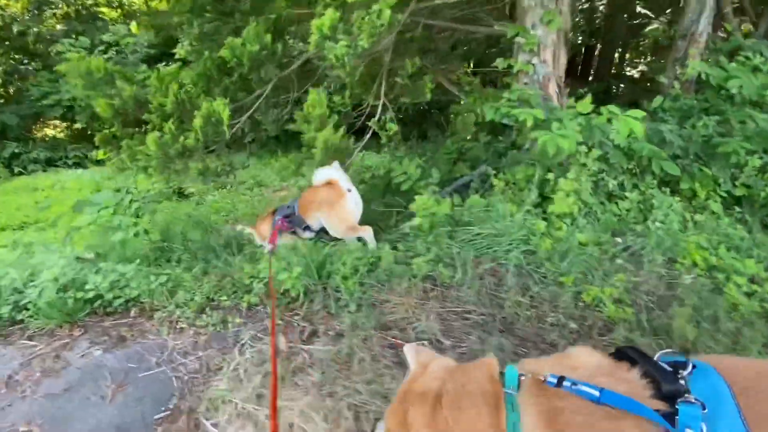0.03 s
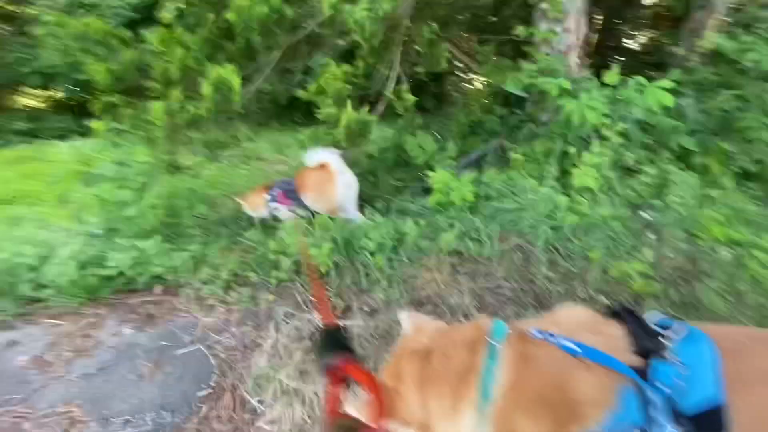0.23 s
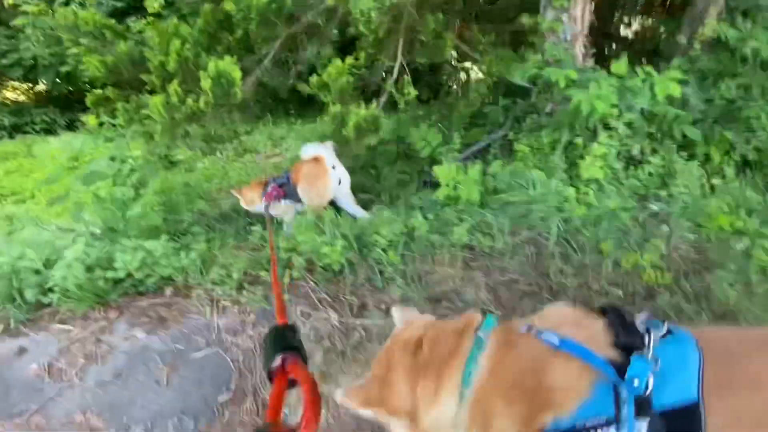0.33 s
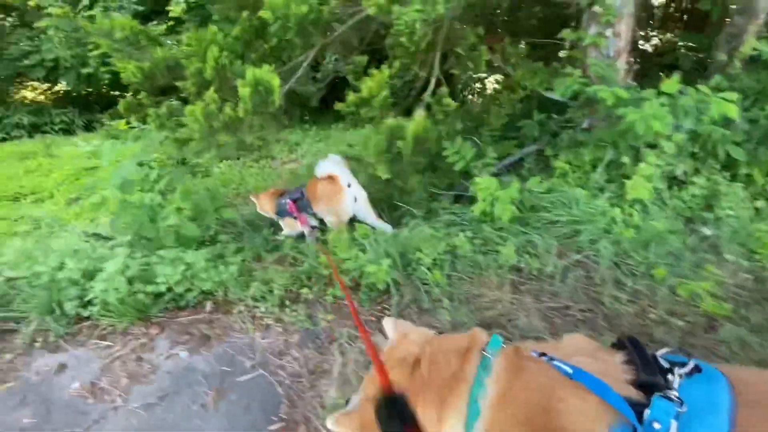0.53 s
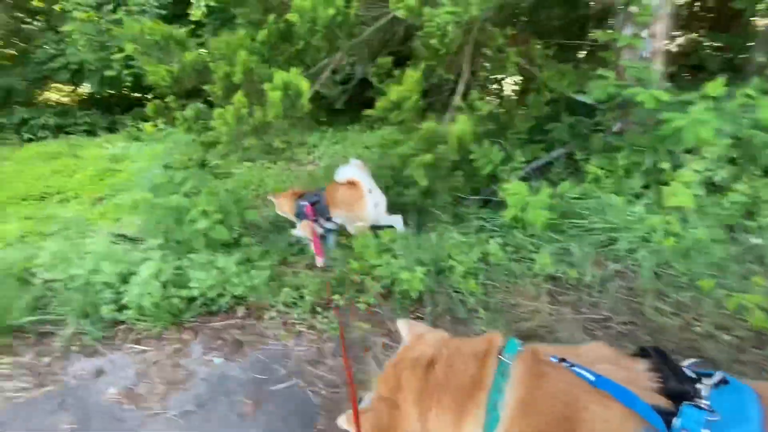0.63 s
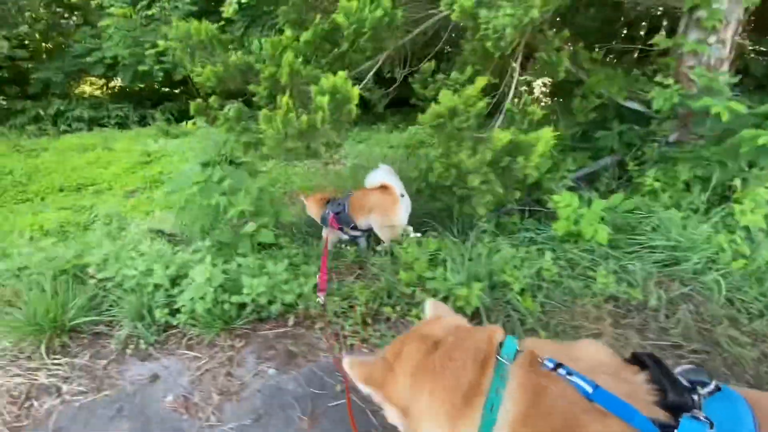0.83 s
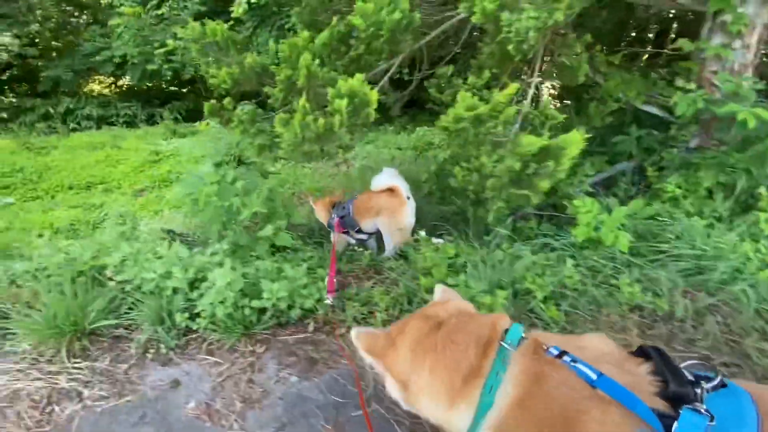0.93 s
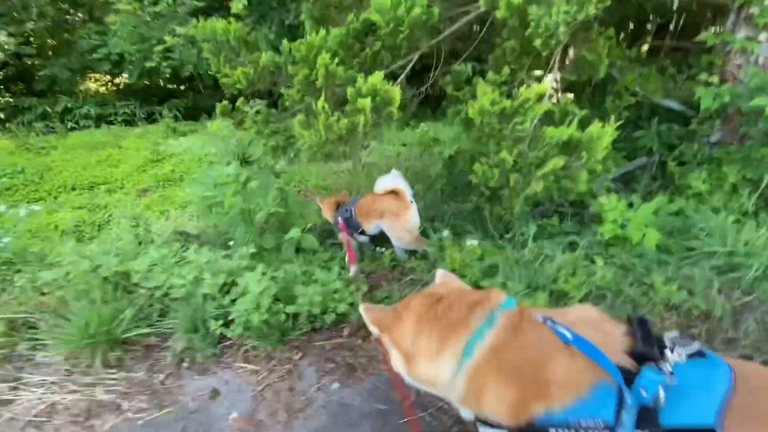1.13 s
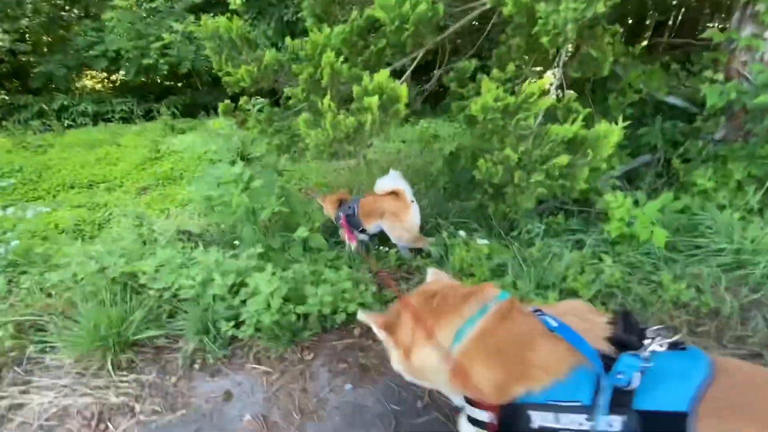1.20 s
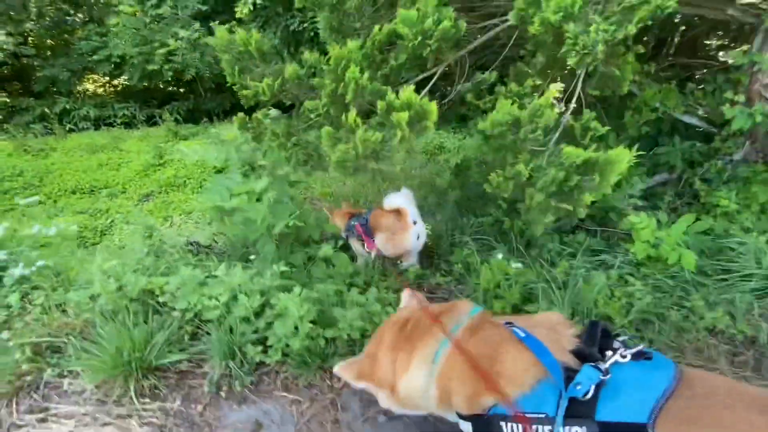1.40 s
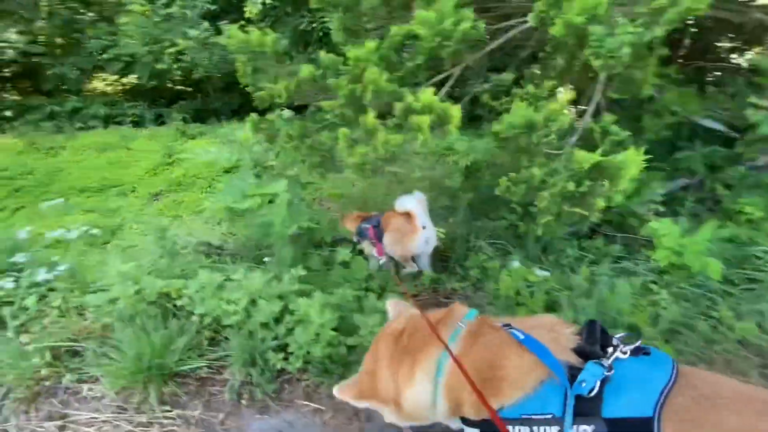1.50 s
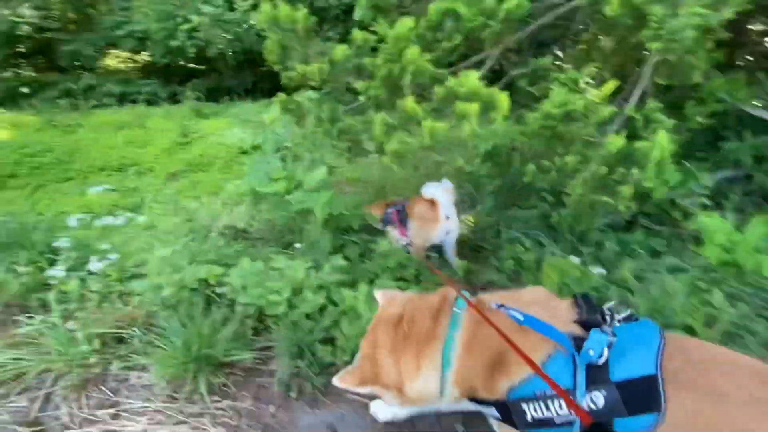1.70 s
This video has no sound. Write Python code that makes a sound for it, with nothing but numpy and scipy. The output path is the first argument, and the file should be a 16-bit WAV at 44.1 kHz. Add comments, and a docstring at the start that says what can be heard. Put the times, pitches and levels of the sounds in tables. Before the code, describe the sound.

A plastic leash handle knocks close by at about 0.2 seconds, a quick hollow clatter with sharp, ringing clicks of metal clips. Lighter buckle clicks follow near 0.4, 1.1 and 1.5 seconds. Feet and dog paws softly pat and scuff on dirt around 0.6, 1.0 and 1.5 seconds. Throughout, an insect ticks faintly on the left over distant insects, hissing leaves and light wind.

```python
"""A plastic leash handle knocks up close and clips and harness buckles click, as two dogs are walked
along a wooded verge. Each knock is a low thud that rings the hollow shell; each click is a crack with
a rattle and a ring of metal. Feet and paws pat and scuff on the dirt. An insect ticks in the bushes
on the left, over a steady bed of far insects, hissing leaves and light wind."""
import sys
import numpy as np
from scipy import signal
from scipy.fft import rfft, irfft
from scipy.io import wavfile

SR = 44100
rng = np.random.default_rng(int(sys.argv[2]) if len(sys.argv) > 2 else 0)


def wrap_up_sound(samples):
    """Save the sound to the file named by the first command line argument, as 16-bit audio."""
    columns = np.atleast_2d(samples).T
    # keep every value between -1 and 1, then stretch to whole-number steps
    tamed = np.clip(columns, -1, 1)
    steps = np.round(tamed * 32767).astype(np.int16)
    wavfile.write(sys.argv[1], SR, steps)


N = 77175
T = np.arange(N) / SR
HZ = np.maximum(np.fft.rfftfreq(N, 1 / SR), 1)
GROUND_LEAD_MS, INSECT_LEAD_MS = 0.088, 0.191  # both lie to the left, so that ear hears them first


def undb(db):
    """Decibels to gain."""
    return 10 ** (np.asarray(db) / 20)


def unit(x):
    """Scale to rms 1."""
    return x / np.sqrt(np.mean(x ** 2))


def hit(x):
    """Scale a short sound to the energy of rms 1 held for 3 ms."""
    return unit(x) * np.sqrt(0.003 * SR / N)


def shape(x, gain):
    """Filter by a gain for each frequency."""
    return irfft(rfft(x) * gain, N)


def colour(points):
    """EQ curve through (frequency [Hz], level [dB]) points."""
    hz, db = np.array(points, float).T
    return undb(np.interp(np.log(HZ), np.log(hz), db))


def band(low_hz, high_hz, order=6):
    """Band-pass gain; a higher order gives steeper edges."""
    return 1 / np.sqrt((1 + (low_hz / HZ) ** order) * (1 + (HZ / high_hz) ** order))


def resonance(hz, q):
    """Response of one damped resonance."""
    return 1 / (1 + 1j * q * (HZ / hz - hz / HZ))


def noise(gain, alike=0):
    """Coloured stereo noise of rms 1; alike is the share common to both ears."""
    white = rng.standard_normal((3, N))
    return unit(shape(np.sqrt(1 - alike) * white[:2] + np.sqrt(alike) * white[2], gain))


def waver(rate_hz):
    """Random flutter of rms 1, mostly slower than rate_hz."""
    return unit(shape(rng.standard_normal(N), np.exp(-(HZ / rate_hz) ** 2) * (HZ > 1)))


def fade(start, rise_s, decay_s):
    """Linear attack, then exponential decay."""
    age = np.maximum(T - start, 0)
    return np.minimum(age / rise_s, 1) * np.exp(-np.maximum(age - rise_s, 0) / decay_s)


def place(x, lead_ms, pan_db=0):
    """Delay the right ear and pan; positive is left."""
    left = np.full_like(HZ, undb(pan_db / 2))
    right = undb(-pan_db / 2) * np.exp(-2j * np.pi * HZ * lead_ms / 1000)
    return shape(x, np.array([left, right]))


def thud(start, low_hz, high_hz, lag_cycles, spread_rad, order=6):
    """A soft band-limited blow whose lows arrive later, so its pitch falls; steep edges sound hollow."""
    phase = -2 * np.pi * (HZ * start + lag_cycles * np.log(HZ))
    ear_phase = np.array([[0.5], [-0.5]]) * spread_rad
    return hit(irfft(band(low_hz, high_hz, order) * np.exp(1j * (phase + ear_phase)), N))


def chime(start, modes):
    """Struck modes that die away."""
    return sum(undb(db) * np.sin(2 * np.pi * hz * (T - start)) * fade(start, 0.00066, t60 / np.log(1000))
               for hz, db, t60 in modes)


def leaves():
    """An even, wide hiss of leaves over a low, uneven rustle."""
    # EQ of the hiss and of the rustle (frequency [Hz], level [dB])
    hiss_eq = [(200, -43), (1500, -15), (2600, 4.5), (3500, 1.5), (4600, 4.5), (7500, 4.5), (10500, 0),
               (12500, -18.5), (14000, 4.5), (15400, 0), (16100, -21)]
    rustle_eq = [(30, 3.5), (100, 3.5), (300, 0), (700, 0.5), (1200, 0), (2200, -3), (3500, -19.5),
                 (8000, -44)]
    # swells of the rustle (time [s], level [dB])
    swells = [(0, -52), (.2, -53), (.45, -53), (.66, -56), (.8, -54.5), (.9, -60), (1.05, -55),
              (1.3, -53.5), (1.5, -57), (1.62, -61), (1.75, -55.5)]
    hiss = noise(colour(hiss_eq), alike=0.011) * undb(-53.5 + 0.5 * waver(31))
    swell_db = np.interp(T, *np.array(swells).T)
    rustle = noise(colour(rustle_eq), alike=0.7) * undb(swell_db + 1.8 * waver(45))
    return hiss + place(rustle, GROUND_LEAD_MS)


def wind():
    """Light gusts rumble on the microphone."""
    # EQ of the rumble (frequency [Hz], level [dB])
    rumble_eq = [(20, -40), (33, -27), (53, 20), (80, -3), (130, 1), (300, -22), (1000, -76)]
    # rise and fall of the gusts (time [s], level [dB])
    gusts = [(0, -77), (.2, -62), (.3, -45), (.4, -66), (.75, -54), (.92, -68.5), (1.02, -51), (1.35, -69),
             (1.54, -58), (1.59, -95), (1.75, -73)]
    gust_db = np.interp(T, *np.array(gusts).T)
    return noise(colour(rumble_eq), alike=0.41) * undb(gust_db + 0.64 * waver(9.1))


def far_insects():
    """A distant chorus blurs into a high shimmer."""
    # EQ of the chorus (frequency [Hz], level [dB])
    chorus_eq = [(3500, -23), (4800, -11), (5400, -1.5), (5850, 2), (6300, -0.5), (7200, -12.5), (8400, -2),
                 (9300, -15), (12000, -43)]
    chorus = noise(colour(chorus_eq), alike=0.28) * undb(-52.5 + 1.2 * waver(38))
    return place(chorus, INSECT_LEAD_MS, pan_db=2.0)


def near_insect():
    """One insect ticks on the left, each tick a short tone echoed by the bushes."""
    # insect ticks (time [s], level [dB])
    ticks = [(0.017, -51.5), (.355, -50), (0.444, -47), (0.489, -52.5), (0.524, -49.5), (0.609, -51),
             (0.672, -53.5), (0.759, -48), (0.843, -50), (0.923, -48.5), (1.173, -47.5), (1.255, -49),
             (1.337, -47), (1.5912, -48.5), (1.7, -50)]
    tick_hz, pitch_scatter, echo_db = 5880, 0.012, -5.5
    tones, echo_envelope = 0, 0
    for start, db in ticks:
        hz = tick_hz * (1 + pitch_scatter * rng.standard_normal())
        tones += undb(db) * hit(np.sin(2 * np.pi * hz * T) * fade(start, 0.0009, 0.0019))
        echo_envelope += undb(db + echo_db) * fade(start, 0.0023, 0.02)
    echo = noise(resonance(tick_hz, q=11) ** 2) * echo_envelope
    return place(tones + echo, INSECT_LEAD_MS, pan_db=15.5)


def feet():
    """Feet and paws land in soft pats with a short crunch and settling dirt; soles drag in the grit."""
    # footfalls and paw pats (time [s], relative level [dB], low edge [Hz], high edge [Hz])
    steps = [(.037, -48, 343, 1196), (.11, -41.5, 130, 564), (.452, -40.5, 296, 630),
             (.462, -48.5, 610, 1160), (.502, -45, 544, 1470), (.5255, -46, 750, 1660),
             (.5275, -38, 400, 645), (.5777, -37, 603, 1490), (.582, -32.5, 200, 486),
             (.592, -42.5, 170, 383), (.65, -46, 453, 1420), (.70, -44.5, 110, 348), (.808, -50, 350, 1300),
             (.9906, -36.5, 129, 281), (.994, -32.5, 75, 149), (.9905, -43, 506, 1010),
             (1.039, -45, 230, 700), (1.058, -42.5, 109, 390), (1.222, -44, 350, 895),
             (1.234, -44, 450, 1730), (1.375, -48, 450, 960), (1.391, -45.5, 900, 1940),
             (1.417, -41.5, 390, 940), (1.4385, -41.5, 440, 1170), (1.472, -45, 573, 1420),
             (1.4735, -37, 268, 510), (1.502, -46, 447, 1390), (1.511, -46, 49.7, 85),
             (1.566, -47.5, 615, 1640), (1.686, -49.5, 280, 900)]
    # soles scuffing (time [s], length [s], level [dB])
    scuffs = [(0.573, 0.028, -56), (0.686, 0.097, -49.5), (1.473, 0.036, -47)]
    # EQ of loose dirt (frequency [Hz], level [dB])
    dirt_eq = [(35, -14), (70, 13), (140, 7.5), (400, 2), (800, 1.5), (2000, -3.5), (4000, -14),
               (10000, -65)]
    pat_db, crunch_db, settle_db = -2.5, -4.5, -20
    pats, settle, drag = 0, 0, 0
    for start, db, low_hz, high_hz in steps:
        pat = thud(start, low_hz, high_hz, lag_cycles=1.4, spread_rad=0.17)
        burst = noise(1, alike=1) * fade(start, 0.0017, 0.012)
        crunch = undb(crunch_db) * hit(shape(burst, band(low_hz, high_hz)))
        pats += undb(db + pat_db) * (pat + crunch)
        settle += undb(db + settle_db) * fade(start, 0.0054, 0.026)
    for start, length, db in scuffs:
        arch = 1 - (2 * (T - start) / length - 1) ** 2
        drag += undb(db) * np.sqrt(np.maximum(arch, 0))
    dirt = colour(dirt_eq)
    grains = noise(1, alike=0.86) * (rng.random(N) < 900 / SR)  # about 900 a second
    grit = unit(shape(grains, dirt))
    return place(pats + settle * noise(dirt, alike=0.99) + drag * grit, GROUND_LEAD_MS, pan_db=0.5)


def clips_and_buckles():
    """Each click is a crack, a short pitched ping, a dying rattle and the ring of the metal clip."""
    # leash and harness clicks (time [s], level [dB], ping pitch [Hz], ping [dB],
    # treble tilt [dB/octave], rattle [dB], left-ear lead [ms], pan [dB], metal ring [dB])
    clicks = [(0.1646, -42.5, 3660, 10.5, -10, -6, 0.083, 1, -6),
              (.2227, -31, 2230, -10, -7, -12.5, -0.055, 1.5, -8),
              (.2403, -52.5, 3700, 6.5, -24, 6.5, 0.067, 2, -6),
              (.2472, -24.5, 4260, -1.5, 4, -15.5, -0.011, -3, -9),
              (0.2474, -25.5, 2740, -2.5, -7, -19.5, -.02, -11, -4),
              (0.2513, -24.5, 5570, -0.5, -7, -44, 0.1, -5, 8),
              (0.2583, -35, 3600, -7, 3, -21, 0.057, 4, 10), (.2632, -41, 4750, 2, 3, -25, 0.035, 11, 19),
              (0.3985, -30, 3830, -3.5, -1.5, -7.5, 0.072, 0.5, 9),
              (1.0136, -41.5, 4500, -7.5, 8, -3, -.016, 0, -9),
              (1.0696, -31, 5500, -3.5, 3.5, -4, 0.057, -1, -3),
              (1.5392, -42.5, 3400, -12, 9.5, -9, 0.026, -2.5, -6)]
    # EQ of the crack and rattle (frequency [Hz], level [dB])
    click_eq = [(300, -10.5), (1350, -0.5), (1750, -5), (2900, 3), (3700, 2), (4450, 3), (5400, 2.5),
                (6200, 5.5), (8000, 1), (10500, 1.5), (12500, -12), (14000, 1.5), (15300, -0.5),
                (16500, -25)]
    # modes of the metal clip (frequency [Hz], relative level [dB], t60 [s])
    clip_modes = [(3382, -33, .11), (3740, -32, .08), (4635, -32, .08), (5390, -31, .08), (6210, -32, .09),
                  (6665, -28, .09), (6730, -30, .07)]
    treble_octaves = np.log2(np.maximum(HZ, 2500) / 5000)
    out = 0
    for start, db, hz, ping_db, tilt_db, rattle_db, lead_ms, pan_db, metal_db in clicks:
        body = colour(click_eq) * undb(tilt_db * treble_octaves)
        crack = hit(shape(noise(1, alike=0.49) * fade(start, 0.00033, 0.0011), body))
        impulse = np.exp(-2j * np.pi * HZ * start)
        ping = undb(ping_db) * hit(irfft(impulse * resonance(hz, q=6.35) ** 2, N))
        rattle = undb(rattle_db) * noise(body) * fade(start, 0.0019, 0.015)
        metal = undb(metal_db) * chime(start, clip_modes)
        out += undb(db) * place(crack + ping + rattle + metal, lead_ms, pan_db)
    return out


def leash_handle():
    """Knocks ring the hollow plastic shell, reach the two ears out of step and leave a brief shudder."""
    # knocks of the handle (time [s], level [dB], low edge [Hz], high edge [Hz],
    # phase between the ears [rad], pan [dB], shell ring [dB])
    knocks = [(.2238, -23, 463, 537, 1.9, -3.5, -16), (0.226, -22, 172, 334, 1.28, -5.5, -38),
              (.236, -26.5, 99, 181, 1.8, -1, -30), (.248, -20.5, 420, 700, 0.83, -1, -3),
              (0.2488, -26.5, 60.3, 172, 3.5, -7, -20)]
    # tones struck by each knock: the low hollow of the shell and a bright row of shell tones above 2 kHz #
    # (frequency [Hz], relative level [dB], t60 [s])
    knock_modes = [(391, -17, 0.6), (516, 8.5, 0.037), (1280, -11, 0.012), (2190, 3, .02),
                   (2700, 6.5, 0.018), (3080, -2, 0.012), (3730, 2, 0.046), (4210, 3, 0.015),
                   (4530, 1.5, 0.041), (5340, 3.5, 0.015)]
    # EQ of the shudder (frequency [Hz], level [dB])
    shudder_eq = [(30, -30), (60, 15), (200, 4.5), (550, -5), (900, -8), (2000, -54), (6000, -63)]
    out = 0
    for start, db, low_hz, high_hz, spread_rad, pan_db, shell_db in knocks:
        knock = thud(start, low_hz, high_hz, lag_cycles=1.197, spread_rad=spread_rad, order=14)
        shell = undb(shell_db) * hit(chime(start, knock_modes))
        shudder = undb(-13.5) * noise(colour(shudder_eq), alike=0.49) * fade(start, 0.0031, 0.028)
        out += undb(db) * place(knock + shell + shudder, lead_ms=0, pan_db=pan_db)
    return out


def scene():
    """The bed of the verge, with the walk in front of it."""
    bed = leaves() + wind() + far_insects()
    return bed + near_insect() + feet() + clips_and_buckles() + leash_handle()


def record(dry):
    """The recorder rolls off the deepest rumble and cuts the very top steeply."""
    low_cut_hz, top_hz = 55, 16400
    lean = signal.sosfilt(signal.butter(2, low_cut_hz, "highpass", fs=SR, output="sos"), dry)
    return signal.sosfilt(signal.ellip(10, 0.2, 75, top_hz, fs=SR, output="sos"), lean)


dry = scene()
out = record(dry)
wrap_up_sound(out)
```